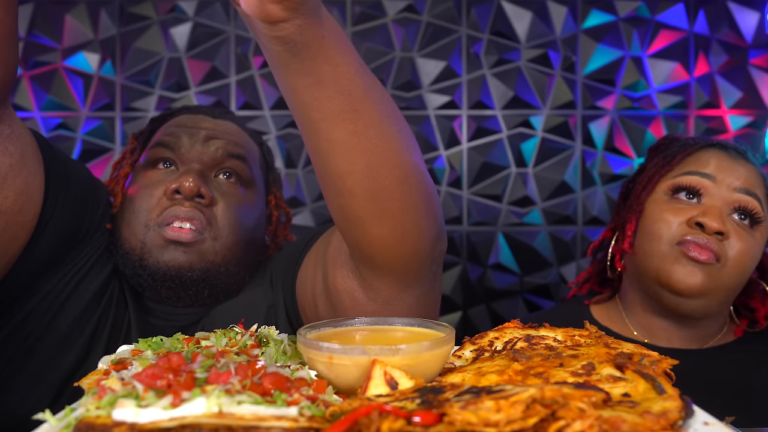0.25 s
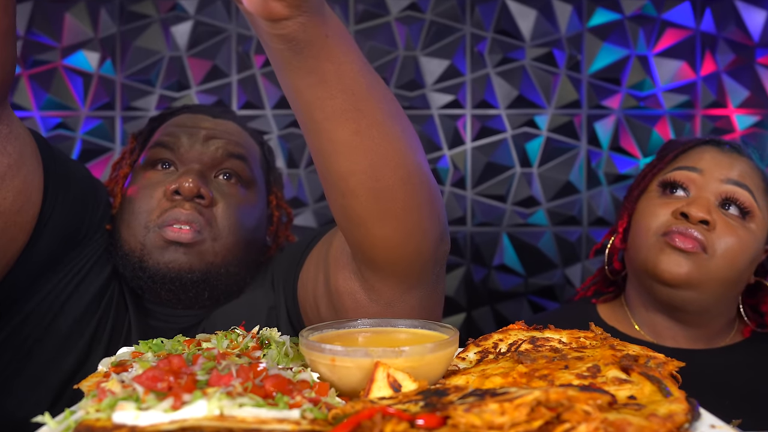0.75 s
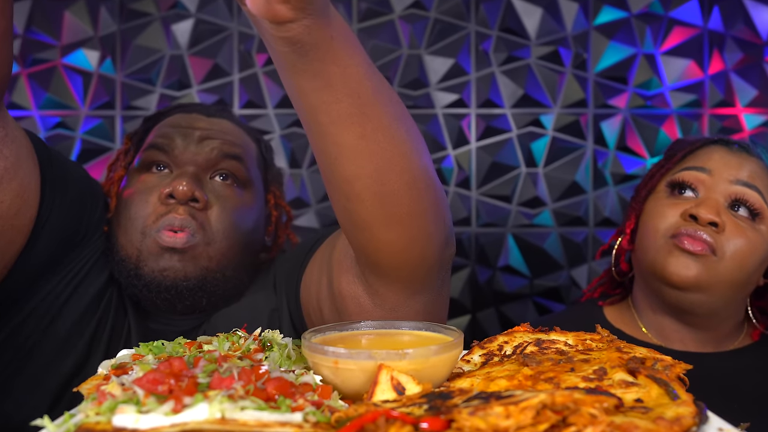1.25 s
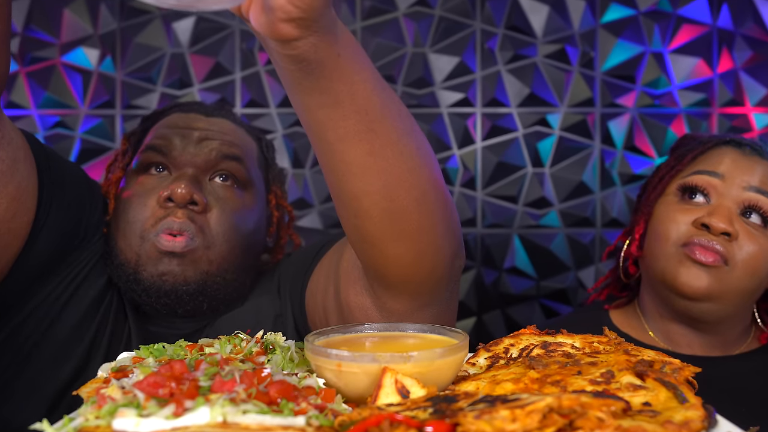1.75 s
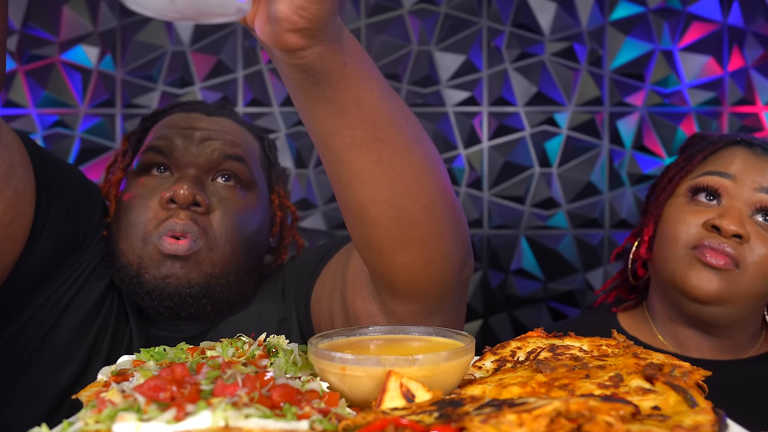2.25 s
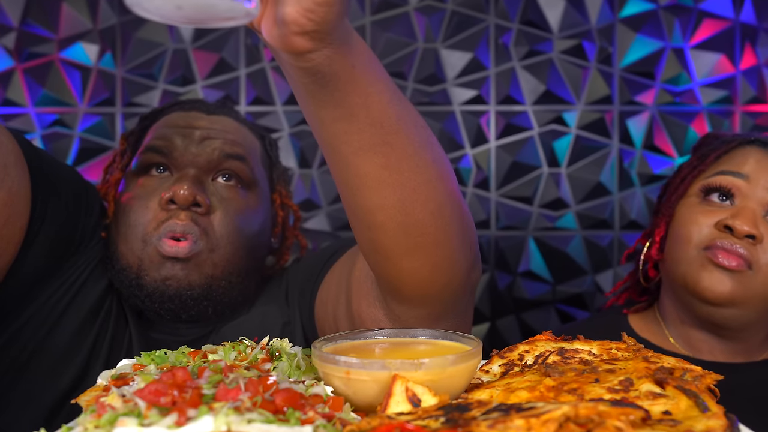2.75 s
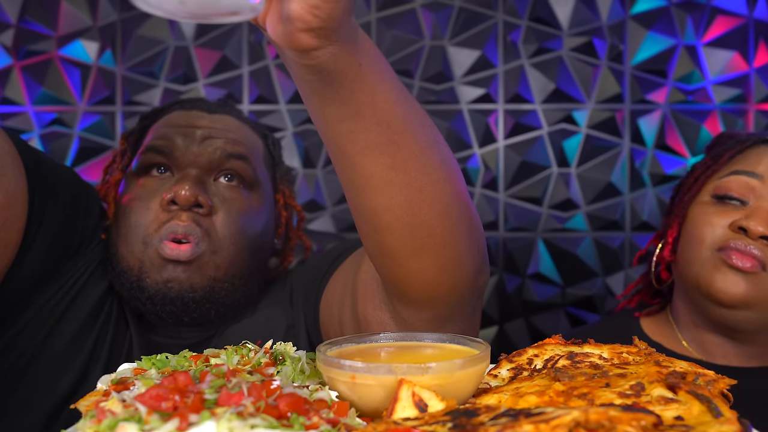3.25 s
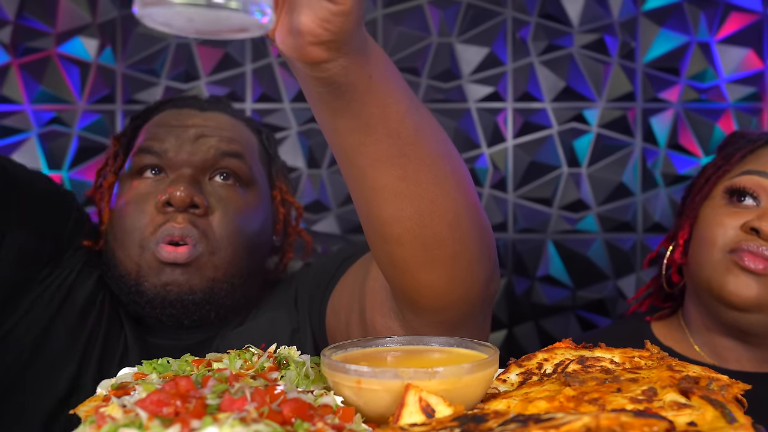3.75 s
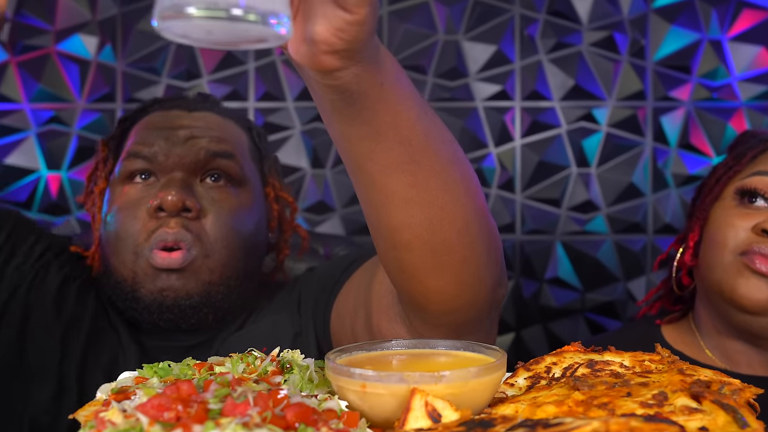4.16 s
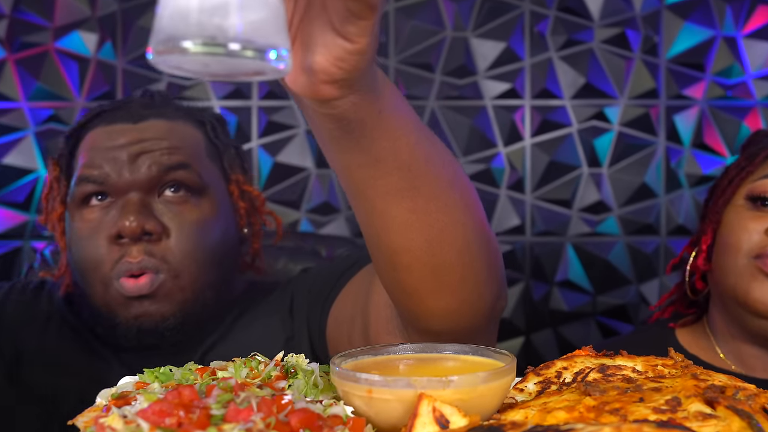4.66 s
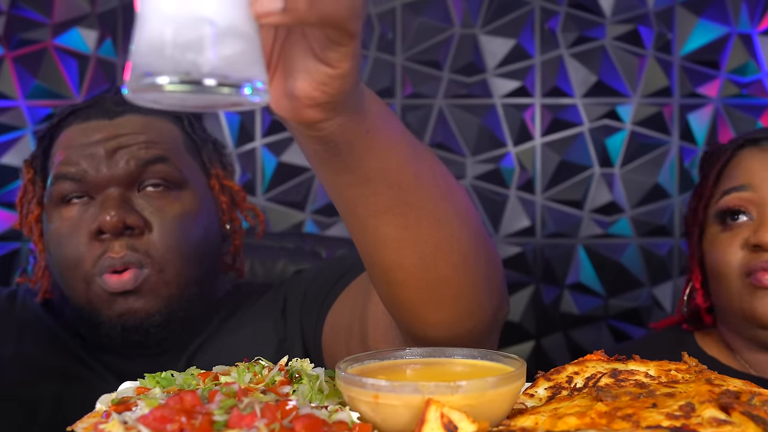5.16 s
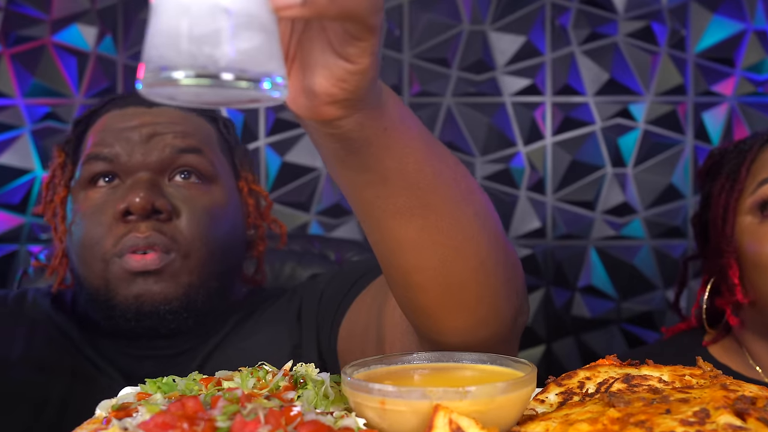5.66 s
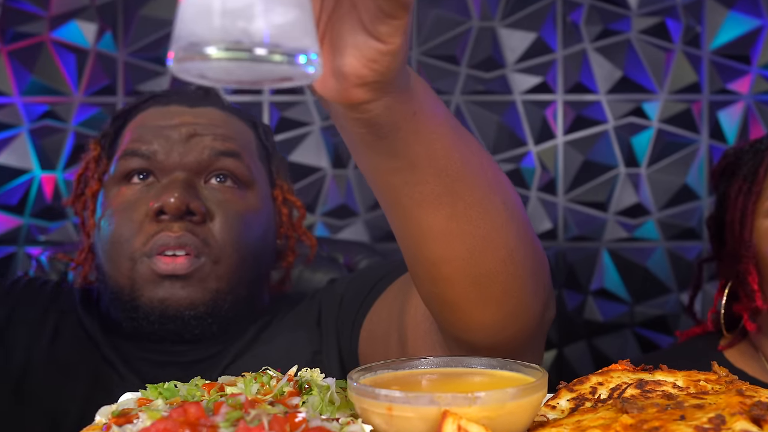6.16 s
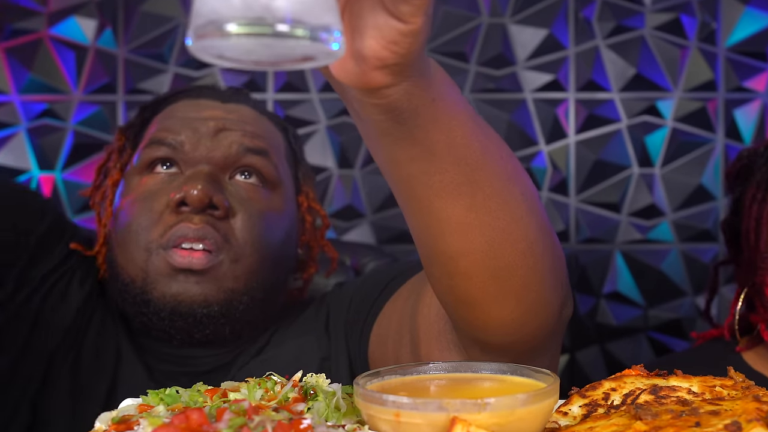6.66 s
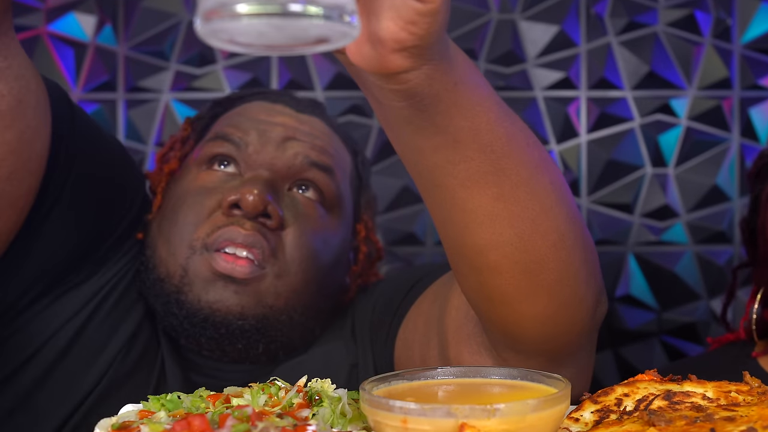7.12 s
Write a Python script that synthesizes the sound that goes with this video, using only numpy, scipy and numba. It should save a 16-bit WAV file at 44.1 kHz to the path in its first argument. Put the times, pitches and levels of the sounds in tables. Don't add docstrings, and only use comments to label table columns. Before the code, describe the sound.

Very close to the microphone in a quiet humming room, soda poured over ice fizzes and crackles from a splashy start. Its hollow bubbling climbs in pitch. Dull hand bumps come early, then air gulps and a bright ice clink near the middle. A bottle lands hard on a table, knocks and rocks to rest with low gulps. Softer fizz continues, and cloth rustles at the end.

```python
import sys
import numpy as np
from scipy import signal
from scipy.fft import rfft, irfft
from scipy.io import wavfile
from scipy.ndimage import uniform_filter1d
from numba import njit

SR = 44100
rng = np.random.default_rng(int(sys.argv[2]) if len(sys.argv) > 2 else 0)


def unload_wav(signal):
    wavfile.write(
        sys.argv[1],
        SR,
        np.round(np.clip(np.atleast_2d(signal).T, -1, 1) * 32767).astype(np.int16),
    )


def how_loud(loudness_db):
    steps = np.asarray(loudness_db, float) / 20
    return 10 ** steps


N = 325899
TIME_S = np.arange(N) / SR
DRIFT_STARTS_S = 5.48


def level(x, db):
    return x * how_loud(db) / np.sqrt(np.mean(x ** 2))


def curve(table):
    time_s, value = np.transpose(table)
    return np.interp(TIME_S, time_s, value)


def colour(x, spectrum):
    hz, db = np.transpose(spectrum)
    f = np.maximum(np.arange(N // 2 + 1) * SR / N, 1)
    return irfft(rfft(x, N) * how_loud(np.interp(np.log(f), np.log(hz), db)), N)


@njit
def svf(x, hz, width):
    y, b, l = np.empty(len(x)), 0., 0.
    for i in range(len(x)):
        g = np.tan(np.pi * hz[i] / SR)
        k = width[i] / hz[i]
        v = (b + g * (x[i] - l)) / (1 + g * (g + k))
        b = 2 * v - b
        l = l + 2 * g * v
        y[i] = k * v
    return y


def band(x, hz, width):
    hz = np.minimum(hz, .45 * SR) + np.zeros(N)
    width = width + np.zeros(N)
    return svf(svf(x, hz, width), hz, width)


def walk(rate_hz):
    hold = int(SR / rate_hz)
    steps = np.repeat(rng.standard_normal(N // hold + 1), hold)
    return 1.05 * uniform_filter1d(uniform_filter1d(steps, hold), hold)[:N]


def bursts(rate_hz, spread_db):
    chance, size, sign = rng.random(N), rng.exponential(size=N), rng.standard_normal(N)
    height = how_loud(np.minimum(spread_db * size, 5 * spread_db))
    return (chance < rate_hz / SR) * np.sign(sign) * height


def swells(rows, rise_db_s, fall_db_s):
    gain = np.zeros(N)
    for s, db, hold_s in rows:
        rise_db = rise_db_s * np.maximum(s - TIME_S, 0)
        fall_db = fall_db_s * np.maximum(TIME_S - s - hold_s, 0)
        gain += how_loud(db - rise_db - fall_db)
    return gain


def add(out, s, sound):
    i = int(s * SR)
    out[i:i + len(sound)] += sound[:N - i]


def ring(hz, t60_s, glide=0.):
    t = np.arange(int(1.2 * t60_s * SR) + 2) / SR
    cycles = hz * (t + glide * t ** 2 / (2 * t60_s))
    return np.sin(2 * np.pi * cycles) * how_loud(-60 * t / t60_s)


def body(force, modes):
    out = np.zeros(N)
    for k, (hz, db, t60_s) in enumerate(modes):
        pole = np.exp(2j * np.pi * hz / SR - np.log(1000) / (t60_s * SR))
        out += (-1) ** k * how_loud(db) * signal.lfilter([1], [1, -pole], force).imag
    return out


def room():
    # freq_hz, density_db
    rumble_spectrum = [(15, -51), (25, -16), (37, -14), (53, -12.5), (91, -18), (99, -8), (114, -9.5),
                       (162, -3), (179, -9.5), (212, 2), (243, -8), (307, -4), (510, -11.5), (1000, -7),
                       (1400, -6), (1820, -32), (3080, -120)]
    # freq_hz, level_db
    motor_tones = [(53, -74), (205, -71.5)]
    mains_hz, mains_db = 120.5, -63
    rumble = colour(rng.standard_normal(N), rumble_spectrum) * how_loud(0.69 * walk(4.62))
    hum = how_loud(mains_db + 1.0 * walk(3.19)) * np.sin(2 * np.pi * mains_hz * TIME_S)
    for hz, db in motor_tones:
        phase = 2 * np.pi * hz * TIME_S + 0.83 * walk(2.86)
        hum += how_loud(db + 0.5 + 1.6 * walk(5.0)) * np.sin(phase)
    return level(rumble, -53) + hum


def treble_patches(count=25):
    out = np.zeros(N)
    length = 1600
    for when, where in rng.random((count, 2)):
        hz = 5000 * 3.0 ** where
        edge = signal.butter(6, [hz - 650, hz + 650], "band", fs=SR, output="sos")
        patch = signal.sosfilt(edge, rng.standard_normal(length)) * signal.windows.tukey(length, .6)
        add(out, 1 + 6 * when, level(patch, -55 - 6 * where))
    return out


def rustle():
    # start_s, level_db, hold_s
    shifts = [
        (6.67, -59, .01),
        (6.952, -47.5, 0.0072),
        (7.11, -48.5, 0.016),
        (7.15, -57, .01),
        (7.22, -48.5, .04),
        (7.31, -43, 0.037),
    ]
    # freq_hz, density_db
    cloth_spectrum = [(59, -37), (100, -15), (125, -4.5), (150, -8), (212, 1.5), (444, -12), (738, -6),
                      (1400, -11), (1820, -41), (3080, -120)]
    grains = level(colour(bursts(900, 3.1), cloth_spectrum), 0)
    return grains * swells(shifts, rise_db_s=900, fall_db_s=400)


def bumps():
    # start_s, peak_db, snap_db (relative)
    bump_events = [(0.004, -36, 6.5), (0.06, -39, 9), (0.123, -46, -7), (1.432, -30.5, -5),
                   (1.585, -27, -5), (1.615, -26, -3), (1.633, -30, -8), (1.679, -31, 0), (1.731, -39.5, 6),
                   (2.005, -35, 6), (3.214, -41, -3), (3.401, -45, 9), (6.948, -41, -9)]
    swing_hz, snap_hz = 117, 288
    out = np.zeros(N)
    for s, db, snap_db in bump_events:
        add(out, s, how_loud(db - 3.0) * ring(swing_hz, 0.0223))
        add(out, s, how_loud(db + snap_db) * ring(snap_hz, 0.01))
    return signal.lfilter(*signal.butter(2, 65, "high", fs=SR), out)


def clinks():
    # start_s, peak_db
    taps = [
        (3.595, -13),
    ]
    # freq_hz, level_db, t60_s
    glass_modes = [(560, -9.5, 0.081), (1574, 2.5, 0.046), (1900, 1, 0.014), (2480, -1.5, 0.033),
                   (3220, -7, .008), (3980, -9, 0.02)]
    chip_s, chip_db, chip_hz, chip_t60_s = 3.6036, -29, 4070, .035
    force = np.zeros(N)
    for s, db in taps:
        add(force, s, how_loud(db - 5.5) * np.hanning(6) / 2.76)
        add(force, s + .0085, how_loud(db - 23.5) * np.hanning(6) / 2.5)
    out = body(force, glass_modes)
    add(out, chip_s, how_loud(chip_db) * ring(chip_hz, chip_t60_s))
    return out


def set_down():
    # start_s, blow_db, contact_s
    blows = [
        (5.2675, -18.5, 0.000215),
        (5.2743, -41, 0.0014),
        (5.279, -38, 0.0024),
        (5.301, -27.5, 0.00058),
        (5.326, -37.5, 0.00044),
        (5.349, -31.5, 0.00088),
        (5.368, -52, 0.001),
        (5.444, -42, 0.00047),
        (5.63, -47, 0.0013),
        (5.725, -51, 0.00082),
    ]
    # freq_hz, level_db, t60_s
    table_modes = [(56.3, -26, 0.82), (114, -10, 0.12), (155.3, -9.5, 0.94), (216.5, -0.5, 0.4),
                   (248, -3.5, 0.15), (294, -4, 0.16), (356.5, -4, 0.11), (398, 0.5, 0.14),
                   (444, 16, 0.016), (484, -2, 0.12), (527, -7, 0.12), (605.3, -3.5, 0.25), (752, -9, 0.24),
                   (847, -1.5, 0.063), (970, -1.5, 0.025), (1130, -18, 0.11), (1427, -9, 0.054),
                   (2600, -9, .012), (2990, -4, 0.049), (3300, -13, .15), (3520, -16, .04),
                   (5200, -24, .02), (6500, -24, .015)]
    # freq_hz, density_db
    scatter_spectrum = [(71, -28.5), (120, -15), (218, -10.5), (563, -9), (938, -22), (1450, -21),
                        (1650, -33), (1800, -23.5), (2220, -32), (3500, -22), (4250, -61), (5250, -33),
                        (8000, -45), (10400, -79), (17600, -120)]
    # start_s, level_db, hold_s
    rolls = [
        (5.375, -36.5, 0.014),
        (5.445, -36, 0.09),
        (5.6, -53, 0.036),
        (5.70, -51, 0.03),
        (5.79, -61, 0.017),
    ]
    roll_hz = 406
    force = np.zeros(N)
    for s, db, contact_s in blows:
        push = np.hanning(max(int(contact_s * SR), 1) + 2)
        add(force, s, -how_loud(db) * push / push.sum())
    after_s = np.maximum(TIME_S - blows[0][0], 0)
    early, late = how_loud(-21 - 60 * after_s / 0.034), how_loud(-25 - 60 * after_s / 0.56)
    scatter = (after_s > 0) * (early + late) * level(colour(rng.standard_normal(N), scatter_spectrum), 0)
    grind = band(bursts(550, 2.86), roll_hz, 3.2 * roll_hz)
    grind = band(grind, roll_hz, 3.8 * roll_hz)
    damped = [(hz, db - 10 * np.log10(t60_s), 0.48 * t60_s) for hz, db, t60_s in table_modes]
    rocking = swells(rolls, rise_db_s=500, fall_db_s=178) * level(body(grind, damped), 0)
    return body(force, table_modes) + scatter + rocking


def glugs():
    # start_s, peak_db, pitch_hz, t60_s
    glug_notes = [
        (3.212, -30.5, 433.8, 0.23),
        (3.231, -33, 431, 0.23),
        (3.269, -41, 460, 0.24),
        (3.474, -41, 545, 0.079),
        (5.439, -28.5, 398, 0.22),
        (5.484, -34, 408.6, 0.56),
        (5.534, -27.5, 244, 0.16),
    ]
    attack_s = 0.0055
    out = np.zeros(N)
    for s, db, hz, t60_s in glug_notes:
        note = ring(hz, t60_s, glide=0.061)
        attack = np.minimum(np.arange(len(note)) / (attack_s * SR), 1)
        add(out, s, how_loud(db) * note * attack)
    return out


def pops():
    # start_s, peak_db, pitch_hz, tick_db, t60_s
    pop_events = [
        (.006, -28, 1470, -33.5, 0.0056),
        (0.086, -31, 1140, -38, 0.023),
        (.123, -22, 1170, -45, 0.015),
        (0.131, -32, 1110, -45, 0.013),
        (.22, -36, 1290, -49, 0.011),
        (0.5523, -28, 1240, -18.5, 0.0098),
        (2.02, -37, 1310, -44, 0.011),
        (3.376, -35, 1490, -46, .012),
    ]
    out = np.zeros(N)
    for s, db, hz, tick_db, t60_s in pop_events:
        add(out, s, how_loud(db) * ring(hz, t60_s, 0.05))
        add(out, s + 0.00019, how_loud(db - 2.0) * ring(1.84 * hz, .9 * t60_s))
        hiss = uniform_filter1d(rng.standard_normal(70), size=2)
        add(out, s, how_loud(tick_db) * np.hanning(70) * hiss)
    return out


def air_column(stream_db, crackle, after_s):
    # time_s, pitch_hz
    column_pitch = [(0, 1140), (1.0, 1385), (2.5, 1645), (3.5, 1878), (5, 1900), (7.39, 1720)]
    pitch_hz = curve(column_pitch)
    width_hz = 630 + 91 * TIME_S
    big = bursts(3500, 2.16) + how_loud(-7.5) * crackle
    main = level(band(big, pitch_hz, width_hz), 0)
    skirt_db = 0.6 + 6 * np.log2(pitch_hz / 1900) - 3.5 * after_s
    skirt = how_loud(skirt_db) * level(band(bursts(4500, 2.6), 1.4 * pitch_hz, 1.74 * width_hz), 0)
    return (main + skirt) * how_loud(0.53 * walk(13) - 44 + stream_db - 1.0)


def foam(stream_db, crackle, until_drift_s, after_s):
    # freq_hz, width_hz, level_db
    bubble_sizes = [(3055, 2370, -0.5), (3860, 3120, 3.5), (4830, 4600, 0.5), (6720, 2300, -5.5)]
    # start_s, level_db, hold_s
    head_rows = [
        (.39, -2, 1),
    ]
    foam_db, collapse_s, collapse_time_s = -40.5, 4.77, .15
    head_db = 2.5 * swells(head_rows, rise_db_s=300, fall_db_s=24)
    collapse_db = 2.5 * (1 + np.tanh((TIME_S - collapse_s) / collapse_time_s)) / 2
    thinning_db = 0.91 * until_drift_s + 0.7 * after_s
    total_db = foam_db + 0.22 * stream_db - thinning_db + head_db - collapse_db
    tilt_db = 0.62 * (total_db - foam_db) + .5 * head_db
    out = np.zeros(N)
    for hz, width_hz, db in bubble_sizes:
        gain_db = db + 0.97 * walk(15) + tilt_db * np.log2(hz / 4000) - 6
        out += how_loud(gain_db) * level(band(bursts(6000, 2.54) + crackle, hz, width_hz), 0)
    return out * how_loud(total_db)


def spray(stream_db, crackle, until_drift_s, after_s):
    # freq_hz, density_db
    spray_spectrum = [(3240, -34.5), (5500, -6), (6360, -0.5), (7860, 0), (9290, 2), (10800, 0),
                      (14300, -1), (15400, -4)]
    splash_db = 2.5 * np.exp(-TIME_S / 0.14)
    spray_db = -43 + 0.14 * stream_db - 0.64 * until_drift_s + 1.5 * after_s + splash_db
    fine = level(colour(bursts(12000, 2.5) + crackle, spray_spectrum), 0)
    return fine * how_loud(spray_db + 0.4 * walk(16))


def fizz():
    # time_s, level_db
    stream = [(0, 3), (.09, 1.5), (.15, -7.5), (.33, -4.5), (.44, -2), (.65, -0.5), (1.2, 0.5), (2.1, 0),
              (2.4, 0), (2.7, -0.5), (3.6, 0), (3.9, -1.5), (4.5, -3), (5.1, -4.5), (5.8, -3.5),
              (6.6, -2.5), (7.25, -3), (7.39, -0.5)]
    stream_db = curve(stream)
    until_drift_s = np.minimum(TIME_S, DRIFT_STARTS_S)
    after_s = np.maximum(TIME_S - DRIFT_STARTS_S, 0)
    crackle = how_loud(0.5) * bursts(350, 1.54)
    surge_db = 0.5 * walk(11) + 0.17 * walk(30)
    out = air_column(stream_db, crackle, after_s)
    out += foam(stream_db, crackle, until_drift_s, after_s)
    out += spray(stream_db, crackle, until_drift_s, after_s)
    return out * how_loud(surge_db)


def scene():
    bubbling = fizz()
    mid = bubbling + pops() + glugs() + set_down() + clinks() + bumps() + rustle() + room()
    low = signal.lfilter(*signal.butter(2, 180, fs=SR), rng.standard_normal(N))
    leaning = signal.lfilter(*signal.butter(1, 200, fs=SR), mid - bubbling)
    side = level(low, -87.0) + how_loud(-33.5) * leaning + treble_patches()
    return np.array([mid - side, mid + side])


def roll_off(x):
    return signal.sosfilt(signal.butter(12, 16510, fs=SR, output="sos"), x)


def record(dry):
    ceiling, bass_hz, top_hz = 0.61, 32, 15750
    rounded = ceiling * np.tanh(dry / ceiling)
    heard = signal.lfilter(*signal.butter(3, bass_hz, "high", fs=SR), rounded)
    top = signal.ellip(10, .3, 70, top_hz, fs=SR, output="sos")
    return roll_off(signal.sosfilt(top, heard))


dry = scene()
out = record(dry)
unload_wav(out)
```